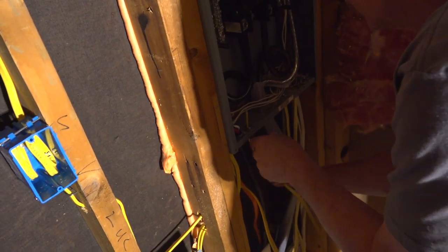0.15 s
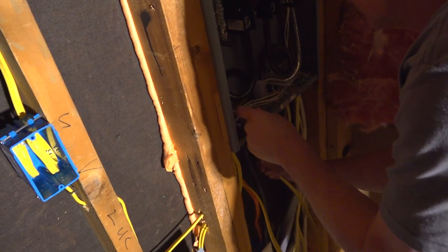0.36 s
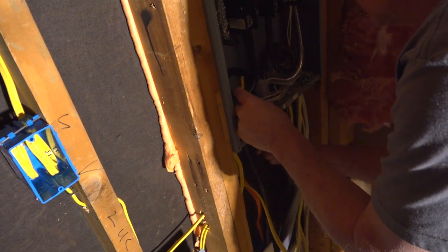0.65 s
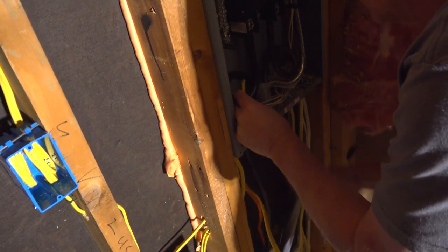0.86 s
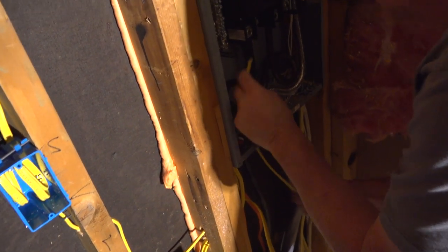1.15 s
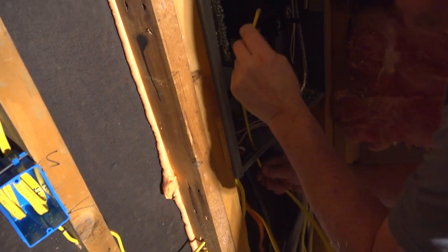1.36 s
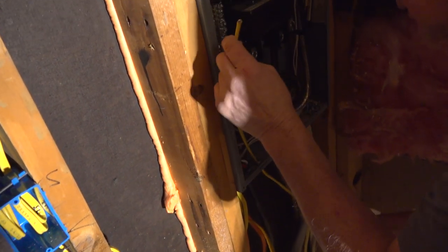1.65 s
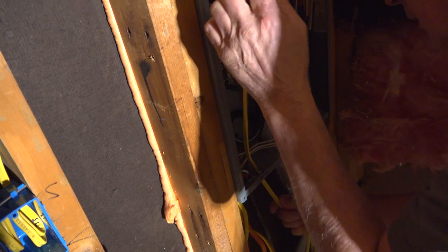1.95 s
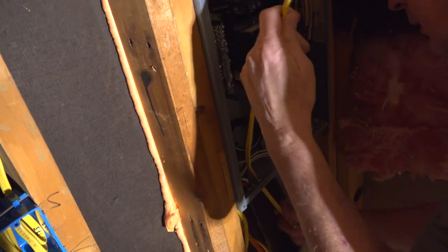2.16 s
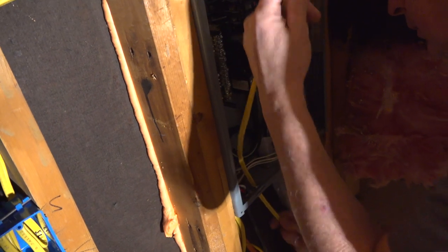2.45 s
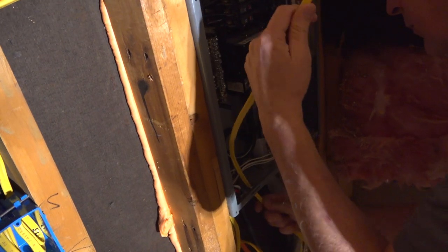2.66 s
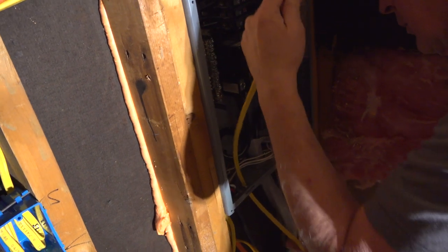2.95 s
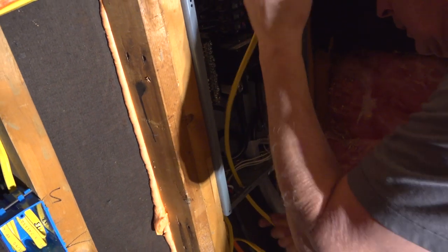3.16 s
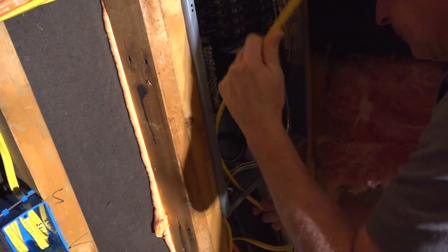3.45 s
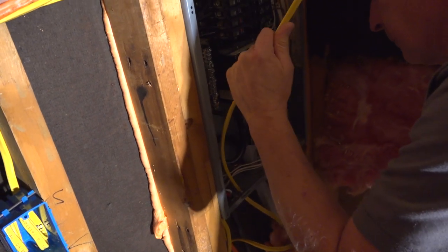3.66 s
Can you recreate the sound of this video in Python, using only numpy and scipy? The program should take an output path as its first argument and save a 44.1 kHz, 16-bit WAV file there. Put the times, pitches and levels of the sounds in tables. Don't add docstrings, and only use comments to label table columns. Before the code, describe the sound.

Plastic-sheathed cable scrapes through a metal connector in four uneven pulls, making the panel ring; light rattles come first, with knocks and hand hiss between pulls, close-miked in a small, fairly dry room.

```python
import sys
import numpy as np
from scipy import signal
from scipy.fft import rfft, irfft
from scipy.io import wavfile

SR = 44100
rng = np.random.default_rng(int(sys.argv[2]) if len(sys.argv) > 2 else 0)


def to_wav(sig):
    pcm = np.clip(np.atleast_2d(sig), -1, 1) * 32767
    pcm = np.round(pcm).astype(np.int16)
    wavfile.write(sys.argv[1], SR, pcm.T)


def voltage_ratio(decibels):
    exponent = np.asarray(decibels, float) / 20
    return 10 ** exponent


N = 167580


def rms_one(x):
    return x / np.sqrt(np.mean(x ** 2) + 1e-20)


def drift(rate_hz):
    r = np.exp(-40 * np.pi * rate_hz / SR)
    noise = rng.standard_normal(N // 20 + 2002)
    slow = signal.lfilter([1], [1, -2 * r, r * r], noise)[2000:]
    return np.interp(np.arange(N) / 20, np.arange(len(slow)), rms_one(slow))


def peak(x, hz, width_hz):
    r = np.exp(-np.pi * width_hz / SR)
    top = [(1 - r * r) / 2, 0, (r * r - 1) / 2]
    return signal.lfilter(top, [1, -2 * r * np.cos(2 * np.pi * hz / SR), r * r], x + 1e-18)


def bands(source, spectrum, patchy_db, rate_hz):
    edges = 18 * 2 ** np.arange(0, 10.1, 1 / 3)
    centres = np.sqrt(edges[1:] * edges[:-1])
    table_hz, table_db = np.transpose(spectrum)
    gains_db = np.interp(np.log(centres), np.log(table_hz), table_db, left=-70)
    used = gains_db > -70
    out = []
    for k in np.nonzero(used)[0]:
        band_filter = signal.butter(2, [edges[k], edges[k + 1]], "band", fs=SR, output="sos")
        flicker = voltage_ratio(gains_db[k] + patchy_db * drift(rate_hz))
        out.append(flicker * signal.sosfilt(band_filter, source[k % 2]))
    out = np.array(out)
    return centres[used], out / np.sqrt(np.mean(out.sum(axis=0) ** 2))


def lean(hz):
    return np.clip(np.log2(hz / 1000) / 1.28, -.6, 1.2)


def background():
    # pitch_hz, level_db (per Hz)
    room_colour = [(12, -29), (20, 11), (65, -3), (759, -18.5), (1330, -20.5), (1480, -22.5), (4420, -34),
                   (6910, -29), (12500, -28.5), (16400, -39)]
    # pitch_hz, level_db (rms)
    hum_tones = [(61, -50.5), (119, -53.5)]
    hum = np.zeros(N)
    for hz, db in hum_tones:
        hum += voltage_ratio(db) * rms_one(peak(rng.standard_normal(N), hz, 7.2))
    _, rumble = bands(rng.standard_normal((2, N)), room_colour, patchy_db=2.5, rate_hz=3.6)
    return hum + voltage_ratio(-47) * rumble.sum(axis=0)


def slides():
    # start_s, length_s, peak_level_db, peak_place (0-1), upper_over_lower_band_db
    strokes = [(-.1, 0.42, -59, 0.65, 1), (0.338, 0.029, -40.5, 0.73, -3), (0.744, 0.33, -42, 0.55, 0.5),
               (1.358, .1, -46, 0.2, 5), (1.517, 0.23, -39.5, 0.47, -0.5), (2.161, 0.08, -48, 0.7, 1.5),
               (2.24, 0.05, -48.5, 0.46, 3), (2.29, 0.11, -51.5, 0.6, 0.5), (2.464, 0.093, -47.5, .3, 3),
               (2.529, 0.2, -37.5, 0.59, 6), (2.741, 0.27, -46.5, 0.41, -1.5),
               (3.137, 0.21, -42, 0.3, -8.5), (3.313, 0.17, -44, 0.52, -6.5), (3.438, 0.14, -41, 0.6, -0.5),
               (3.546, 0.38, -46, 0.32, 2.5)]
    # pitch_hz, level_db (per Hz)
    skin_colour = [(2000, -8), (4000, -6), (5350, -1.5), (6400, -1.5), (7400, -0.5), (8600, -5.5),
                   (11500, 2.5), (16400, -9)]
    # pitch_hz, width_hz, level_db
    grip = [(5300, 1030, -8.5), (11500, 1360, -6.5)]
    split_hz = 8500
    t = np.arange(N) / SR
    speed = np.zeros((2, N))
    for s, length, db, place, upper_db in strokes:
        top_s = s + length * np.clip(place, .1, .9)
        u = np.interp(t, [s, top_s, s + length], [0, .5, 1])
        levels = voltage_ratio([[db - upper_db / 2], [db + upper_db / 2]])
        speed += levels * np.abs(np.sin(np.pi * u)) * (u < 1)
    band_hz, hiss = bands(rng.standard_normal((2, N)), skin_colour, patchy_db=2.2, rate_hz=7)
    halves = [hiss[band_hz < split_hz].sum(axis=0), hiss[band_hz >= split_hz].sum(axis=0)]
    out = np.zeros(N)
    for half, gain, (hz, width, db) in zip(halves, speed, grip):
        rung = peak(peak(rng.standard_normal(N), hz, width), hz, width)
        hollow = rms_one(rung) * voltage_ratio(db + 2.0 * drift(6.5))
        out += gain * (half + hollow)
    return out * voltage_ratio(1.4 * drift(19))


def pulls():
    # time_s, drag_level_db, edge_brightness_db
    nudge = [
        (0, -62, 0),
        (.19, -44.5, -9.5),
        (.3, -57.5, -2),
        (.57, -44, -3.5),
        (.7, -52, -12.5),
        (1.05, -65.5, 7),
    ]
    pull_1 = [
        (1.069, -61.5, -6),
        (1.102, -45.5, -15),
        (1.139, -24.5, 2),
        (1.25, -24.5, 3),
        (1.328, -29, 9),
        (1.36, -37.5, 3.5),
        (1.431, -33.5, -5),
        (1.49, -48.5, -19),
        (1.53, -39, 0),
    ]
    pull_2 = [
        (1.599, -49, 2),
        (1.76, -57.5, -10),
        (1.779, -40.5, 2.5),
        (1.84, -37.5, -7),
        (1.852, -30, 6.5),
        (1.91, -30, 4),
        (1.96, -32.5, 3),
        (2.04, -33, 0),
        (2.1, -58.5, -8),
    ]
    pull_3 = [
        (2.423, -34.5, -1.6),
        (2.518, -43.5, -3.5),
        (2.565, -34.5, -1.5),
        (2.582, -25.5, 0),
        (2.635, -45, -0.3),
        (2.675, -29, 0.5),
        (2.71, -55, -1),
        (2.76, -44.5, -4),
        (2.83, -57, 1),
    ]
    pull_4 = [
        (3.045, -48, -9),
        (3.061, -26.5, 2),
        (3.105, -25, 2),
        (3.125, -29, -0.5),
        (3.2, -31, -0.5),
        (3.228, -30, -2),
        (3.332, -40.5, -3),
        (3.405, -36, -6),
        (3.482, -59, 4),
    ]
    settle = [
        (3.498, -59, 12),
        (3.54, -39.5, 3.4),
        (3.62, -46, 3.9),
        (3.8, -53.5, 10),
    ]
    # pitch_hz, width_hz, level_db
    panel = [(331, 28, -12.5), (490, 25, -9), (602, 37.5, 0.5), (662.6, 51, 4.5), (800.4, 17, -4.5),
             (995.5, 64, 1.5), (1368, 39, -2), (1565, 34, -8), (1881, 134, -3), (2220, 49, -35),
             (2516, 150, -2.5)]
    # pitch_hz, width_hz, level_db
    edge = [(3290, 380, -19.5), (4600, 370, -7.5), (5480, 350, -12), (6010, 250, -9.5), (6930, 600, -16.5),
            (9000, 440, -21), (10130, 930, -12.5), (12000, 1500, -17), (14500, 2500, -32)]
    # pitch_hz, level_db (per Hz)
    scrape_colour = [(250, -28), (500, 7), (2200, 6), (3000, 0), (4000, -7.5), (6000, -40), (8300, -20),
                     (16000, -93)]
    slips_per_s, slip_spread_db, judder_db, ring_wander_db, scrape_db = 5500, 3.2, 1.5, 3.0, -7

    t = np.arange(N) / SR
    drag_db = np.full(N, -120.)
    edge_db = np.zeros(N)
    for stroke in (nudge, pull_1, pull_2, pull_3, pull_4, settle):
        s, db, bright = np.transpose(stroke)
        on = (t >= s[0]) & (t <= s[-1])
        drag_db[on] = np.interp(t[on], s, db)
        edge_db[on] = np.interp(t[on], s, bright)

    sizes = voltage_ratio(slip_spread_db * np.minimum(rng.exponential(1, (2, N)), 3))
    sizes = sizes * rng.choice([-1, 1], (2, N))
    slips = rms_one(sizes * (rng.random((2, N)) < slips_per_s / SR))
    force = slips * voltage_ratio(drag_db + judder_db * drift(55))

    unit = np.sqrt(sum(voltage_ratio(2 * db) for _, _, db in panel))
    out = np.zeros(N)
    for k, (hz, width, db) in enumerate(panel + edge):
        drive = force[k % 2] * voltage_ratio(ring_wander_db * drift(18.8) + edge_db * lean(hz))
        if k >= len(panel):
            drive = peak(drive, hz, 2 * width)
        evened = np.sqrt(SR / (np.pi * width))
        out += (-1) ** k * voltage_ratio(db) / unit * peak(drive, hz, width) * evened

    hz, broad = bands(force, scrape_colour, patchy_db=3, rate_hz=15)
    scrape = (broad * voltage_ratio(lean(hz)[:, None] * edge_db)).sum(axis=0)
    return out + voltage_ratio(scrape_db) * np.sqrt(np.mean(force ** 2)) * scrape


def locknut():
    # time_s, peak_level_db, favoured_pitch_hz (set by the contact point), favour_db
    touches = [(0.1231, -17, 11950, 15), (0.125, -25, 13600, 12), (0.173, -14, 9057, 17.5),
               (0.18, -15, 11950, 10), (0.2034, -18, 13600, 13), (0.2043, -24, 11950, 15),
               (.234, -20.5, 11950, 13), (0.2764, -21.5, 11950, 4), (0.3061, -27, 11950, 3),
               (0.3344, -23.5, 11950, 8), (.374, -27.5, 11950, 12), (0.4064, -33, 13600, 8),
               (0.6279, -20.5, 11950, 13.5), (0.632, -15, 11950, 12), (2.4525, -20, 11950, 13.5)]
    # pitch_hz, level_db, fade_s (by 60 dB)
    nut = [(2200, -5, 0.012), (2870, -14, 0.0087), (4750, -13.5, 0.021), (6070, -16.5, 0.031),
           (7150, -21, 0.014), (9057, -36, 0.25), (11950, -18, 0.041), (13600, -37, 0.22)]
    ring_db, tick_db, tick_fade_s, tick_cut_hz = -3, -11, 0.045, 7500
    hits = np.zeros((len(touches), N + 2000))
    chance_db = rng.normal(0, 2, (len(touches), len(nut)))
    noise = rng.standard_normal((len(touches), 2000))
    t = np.arange(2000) / SR
    out = np.zeros(N + 2000)
    dull = np.exp(-2 * np.pi * tick_cut_hz / SR)
    for row, (s, db, *_), w in zip(hits, touches, noise):
        i = int(s * SR)
        scuff = .08 * w * np.exp(-t / .002)
        row[i:i + 2000] = voltage_ratio(db + ring_db) * (scuff + (t == 0))
        tick = signal.lfilter([1 - dull], [1, -dull], w[::-1])
        out[i:i + 2000] += voltage_ratio(db + tick_db - 60 * t / tick_fade_s) * tick
    favoured_hz, favour_db = np.transpose(touches)[2:]
    for k, (hz, level_db, fade_s) in enumerate(nut):
        favoured = abs(np.log(favoured_hz / hz)) < .1
        clicks = voltage_ratio(level_db + chance_db[:, k] + favour_db * favoured) @ hits + 1e-18
        r = voltage_ratio(-60 / (fade_s * SR))
        turn = 2 * np.pi * hz / SR
        out += signal.lfilter([0, np.sin(turn)], [1, -2 * r * np.cos(turn), r * r], clicks)
    return signal.sosfilt(signal.butter(4, 1500, "high", fs=SR, output="sos"), out[:N])


def grabs():
    # middle_s, length_s, level_db (rms), pitch_hz
    grips = [(.2, 0.1, -46, 655), (.52, 0.05, -42, 640), (.575, 0.04, -39.5, 637), (.61, 0.03, -42, 653),
             (2.69, 0.08, -46.5, 157), (1.89, 0.037, -37.5, 5870), (1.3, 0.3, -48.5, 166),
             (1.99, 0.06, -37, 632), (3.54, 0.035, -50, 8300), (0.737, 0.025, -34, 653),
             (1.137, 0.0211, -25, 667), (1.293, 0.035, -32.5, 5860), (1.337, 0.012, -31, 4600),
             (1.345, 0.07, -36.5, 450), (1.435, 0.035, -33, 730), (1.512, 0.02, -31, 1350),
             (1.175, 0.03, -31.5, 2570), (1.246, 0.057, -23.5, 643), (1.318, .035, -24.5, 1860),
             (1.83, 0.077, -43.5, 320), (2.602, 0.041, -27, 1900), (2.682, 0.029, -33.5, 618),
             (3.093, 0.042, -26.5, 1835), (3.065, 0.025, -30.5, 997), (3.136, 0.018, -25.5, 1410),
             (3.512, 0.012, -37.5, 330), (3.72, 0.15, -56, 2400), (2.21, 0.037, -47, 550),
             (3.136, .015, -18, 652), (3.225, 0.031, -26.5, 614), (3.396, 0.02, -30.5, 670),
             (3.159, 0.32, -44, 110), (3.5, 0.39, -46.5, 120), (3.596, 0.28, -49, 388),
             (3.542, 0.091, -43, 1525), (3.09, 0.065, -35, 3410), (1.19, .05, -27.5, 1305)]
    out = np.zeros(N)
    for (s, length, db, hz), w in zip(grips, rng.standard_normal((len(grips), SR // 2))):
        size = int(np.clip(length, .005, .4) * SR)
        width = max(0.066 * hz, 70)
        rung = peak(peak(w, hz, 3 * width), hz, width)[-size:]
        i = int(s * SR) - size // 2
        out[i:i + size] += voltage_ratio(db) * rms_one(rung * np.sqrt(np.hanning(size)))
    return out


def knocks():
    # time_s, peak_level_db, fade_s (by 60 dB), centre_hz
    hits = [(.636, -23, 0.068, 6000), (.53, -45, 0.056, 9000), (0.7254, -24.5, 0.033, 2440),
            (1.1047, -36.5, 0.03, 2200), (1.1425, -23.5, 0.021, 8000), (1.3615, -31, 0.073, 4500),
            (1.499, -20.5, 0.04, 7000), (1.504, -10, 0.03, 9000), (1.507, -16.5, 0.038, 2530),
            (1.775, -40.5, 0.05, 2400), (1.8467, -27.5, 0.1, 3400), (2.2, -35.5, 0.033, 2029),
            (2.4222, -19.5, 0.049, 3400), (2.4529, -25, 0.042, 5950), (2.482, -36, 0.055, 5200),
            (2.577, -9, 0.045, 4440), (2.596, -23, 0.064, 2940), (2.7212, -27, 0.027, 3260),
            (2.751, -37.5, 0.055, 1100), (3.13, -23, 0.027, 9000), (3.569, -32.5, 0.043, 11000)]
    below_db, above_db, rise_s = 5, 9, 0.0013
    size = 8192
    out = np.zeros(N + size)
    t = np.arange(size) / SR
    hz = np.maximum(np.arange(size // 2 + 1) * SR / size, 20)
    white = rng.standard_normal((len(hits), size))
    lumps_db = rng.normal(0, 3, (len(hits), 40))
    for (s, db, fade_s, centre_hz), w, lump in zip(hits, white, lumps_db):
        octaves = np.log2(hz / centre_hz)
        slope_db = np.minimum(below_db * octaves, -above_db * octaves)
        colour = voltage_ratio(slope_db + np.interp(hz, np.linspace(0, SR / 2, len(lump)), lump))
        crunch = rms_one(irfft(rfft(w) * colour))
        i = int(s * SR)
        out[i:i + size] += crunch * voltage_ratio(db - 60 * t / fade_s) * np.minimum(1, t / rise_s)
    return out[:N]


def room(x):
    t = np.arange(int(.3 * SR)) / SR
    tail = rng.standard_normal(len(t)) * voltage_ratio(-60 * t / 0.14) * (t > .004)
    tail = signal.lfilter([.4], [1, -.6], tail)
    return signal.fftconvolve(x, tail / np.sqrt(np.sum(tail ** 2)))[:N]


def scene():
    near = slides() + pulls() + locknut() + grabs() + knocks()
    return (near + voltage_ratio(-13.5) * room(near) + background())[None]


def band_limit(x):
    return signal.sosfilt(signal.butter(12, 16980, fs=SR, output="sos"), x)


def record(dry):
    overload = .7
    soft = overload * np.tanh(dry / overload)
    top_cut = signal.ellip(10, .5, 55, 15750, fs=SR, output="sos")
    return band_limit(signal.sosfilt(top_cut, soft))


dry = scene()
out = record(dry)
to_wav(out)
```